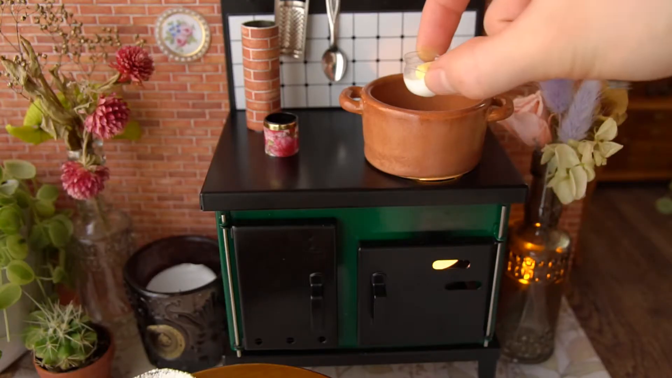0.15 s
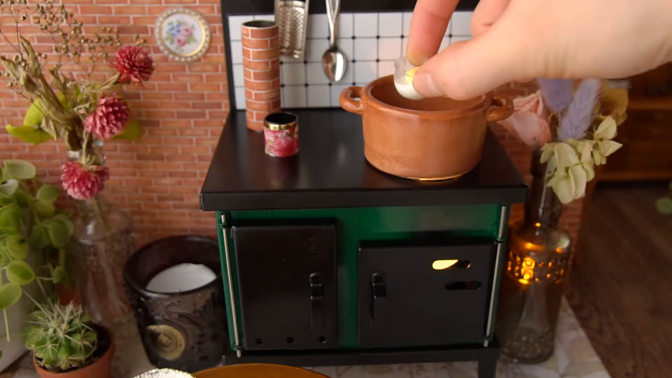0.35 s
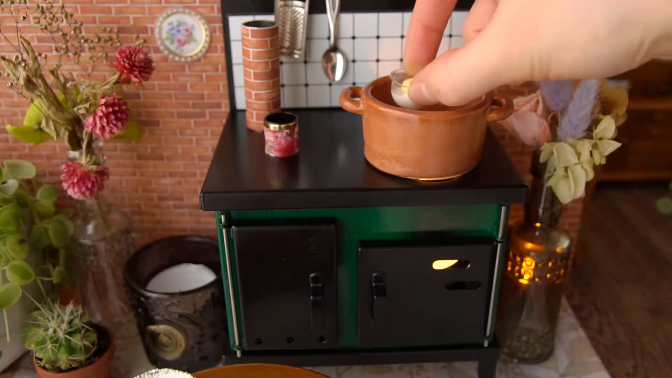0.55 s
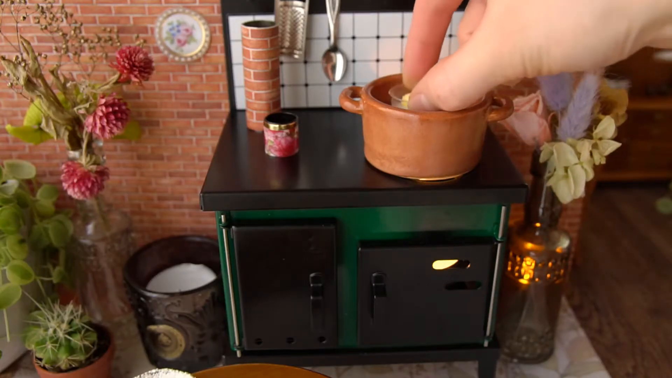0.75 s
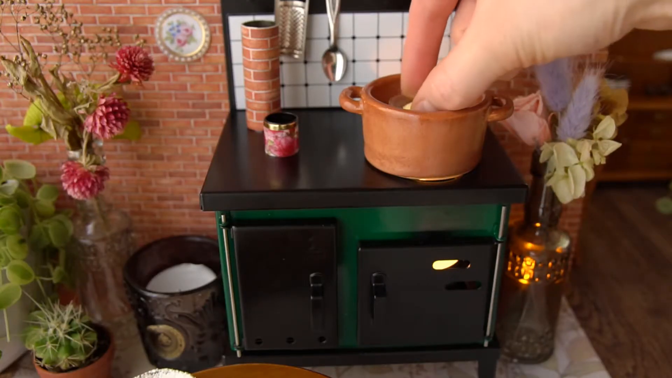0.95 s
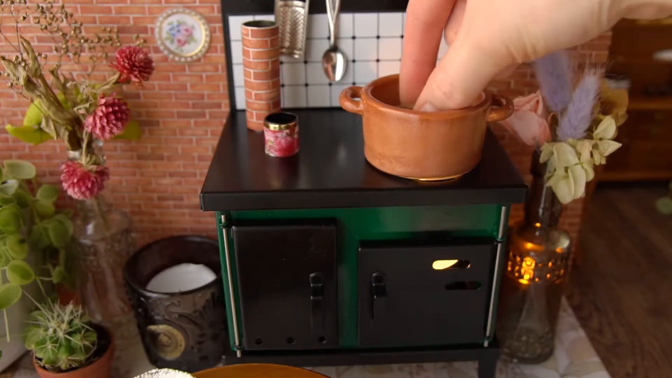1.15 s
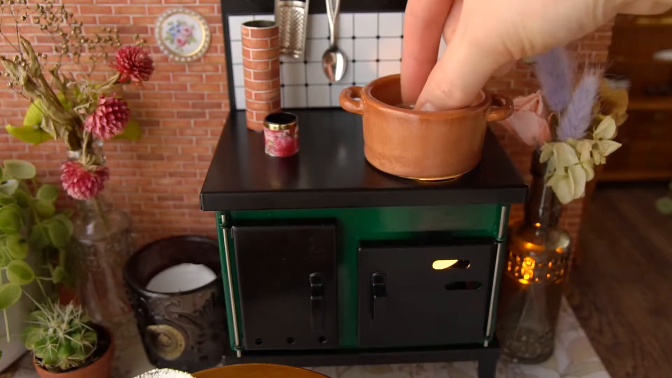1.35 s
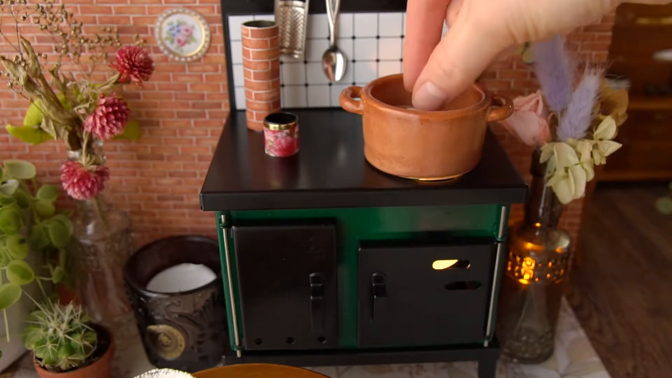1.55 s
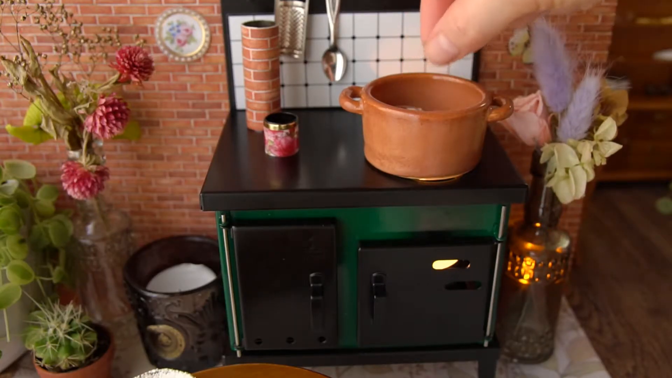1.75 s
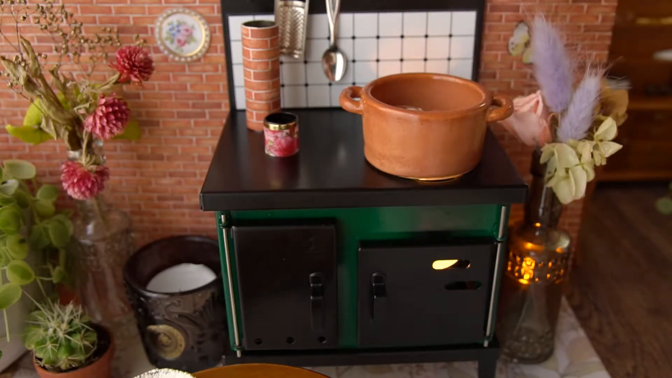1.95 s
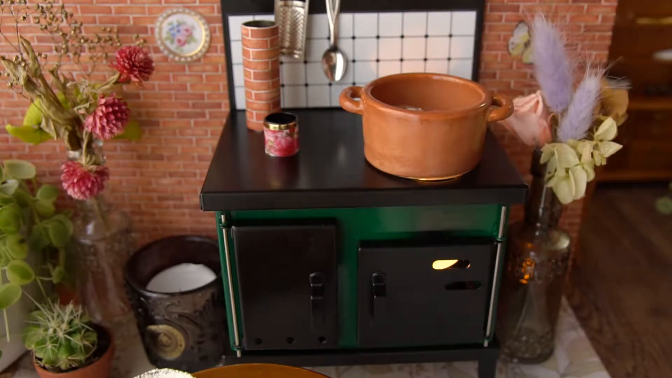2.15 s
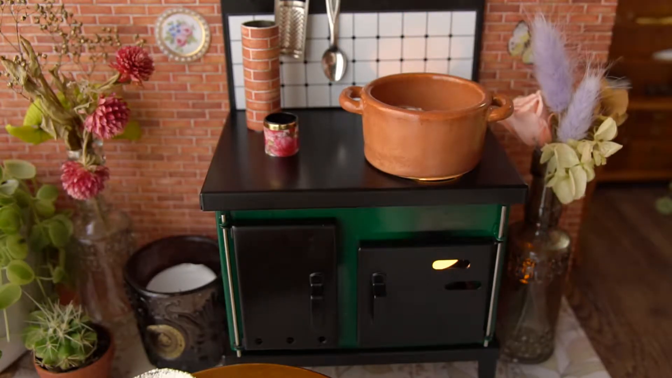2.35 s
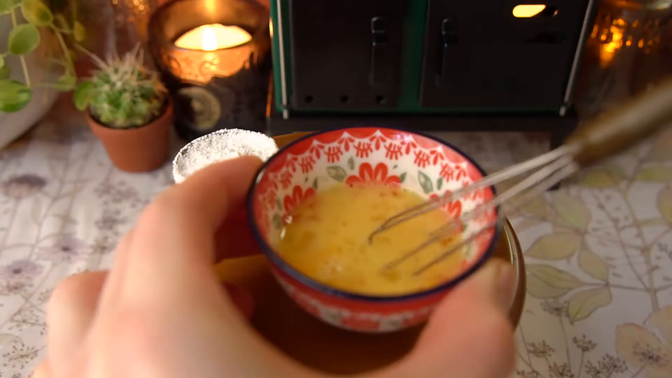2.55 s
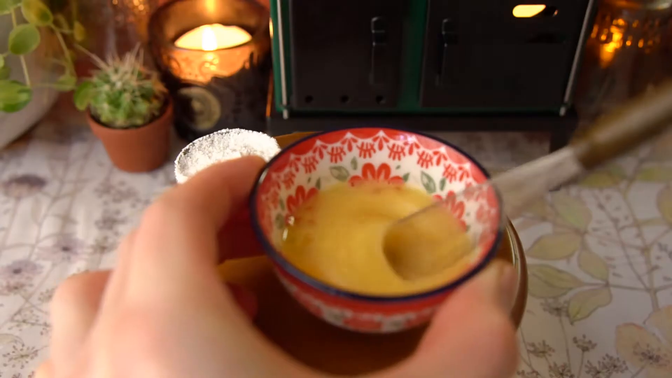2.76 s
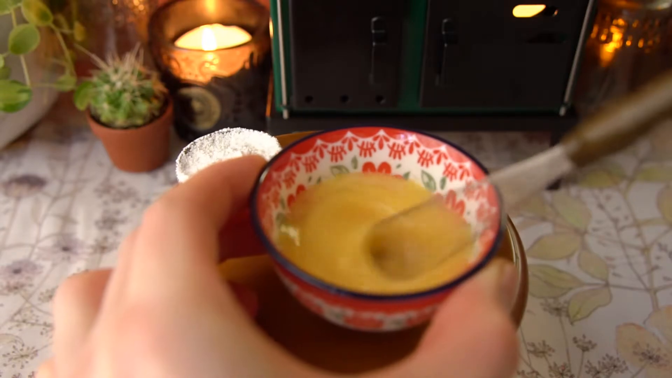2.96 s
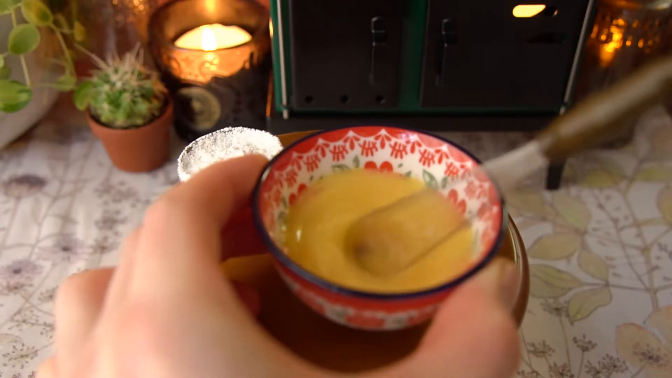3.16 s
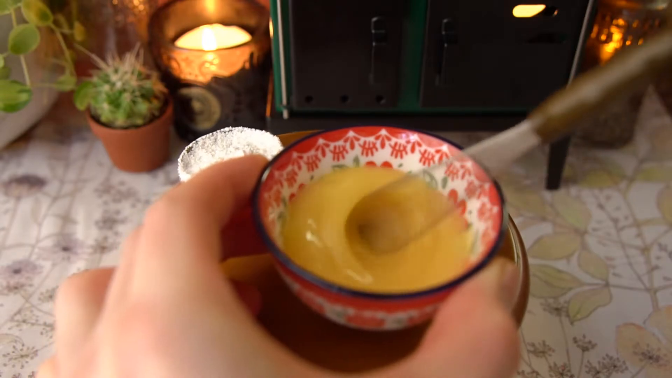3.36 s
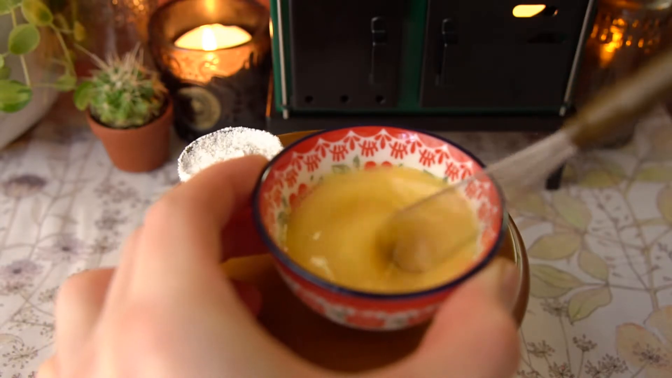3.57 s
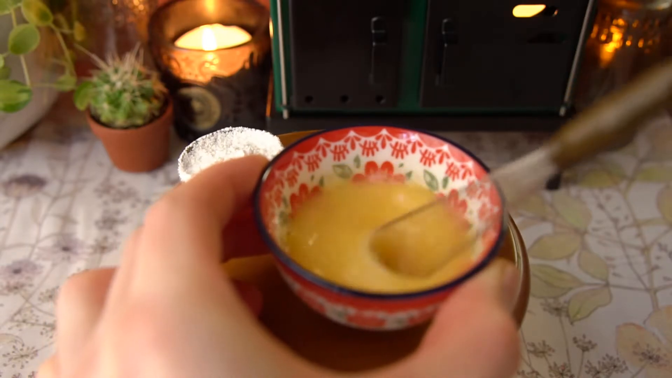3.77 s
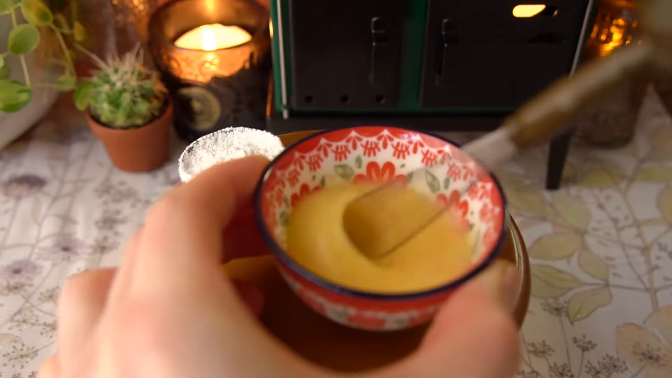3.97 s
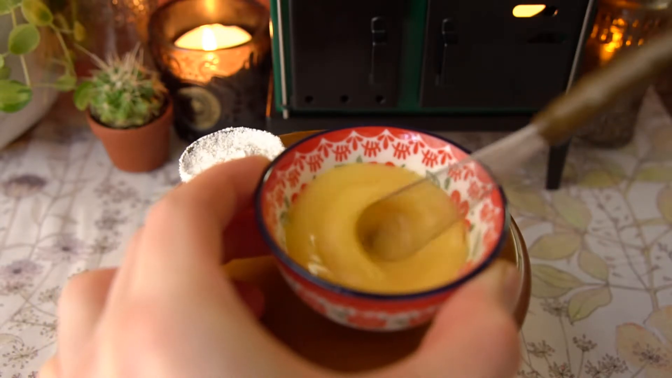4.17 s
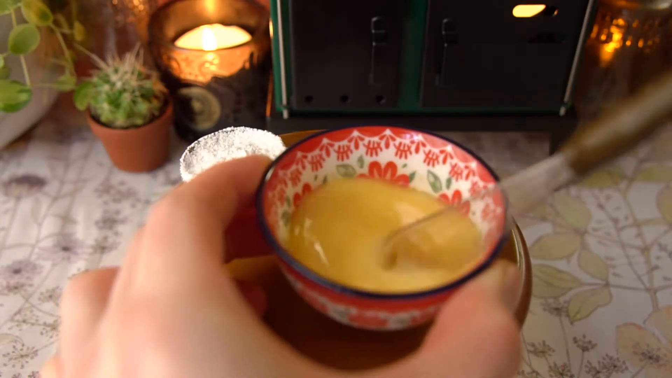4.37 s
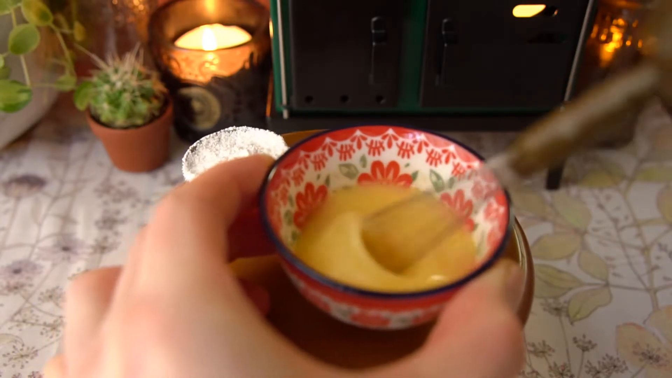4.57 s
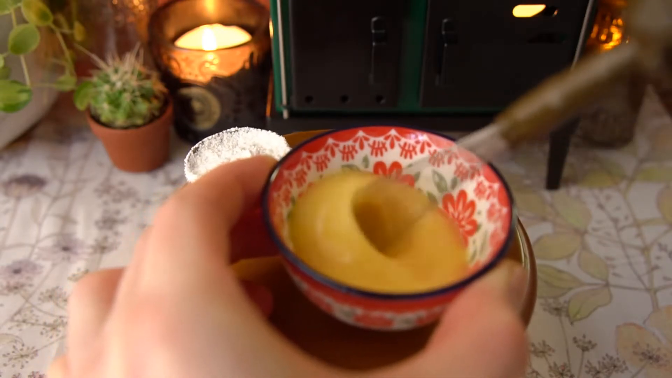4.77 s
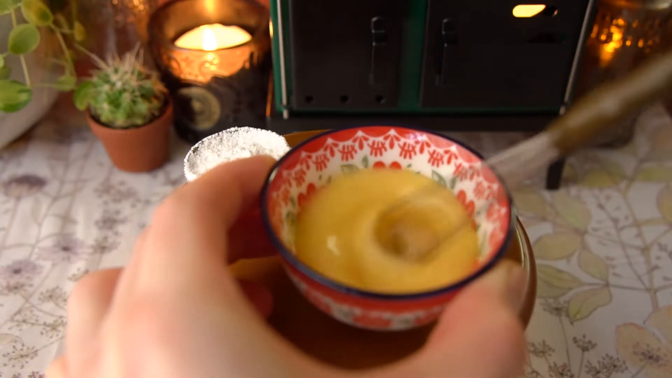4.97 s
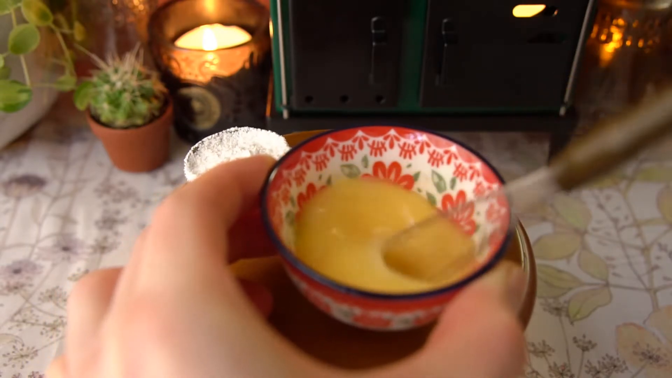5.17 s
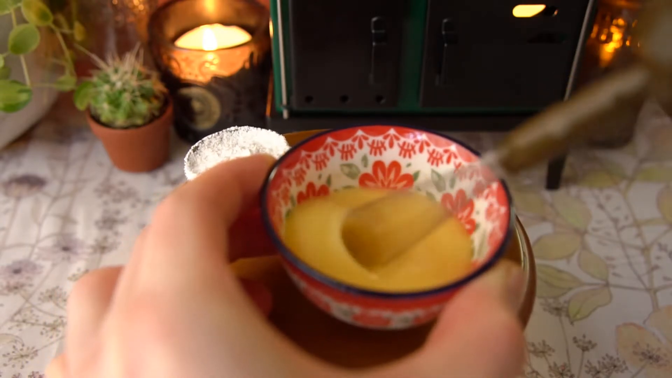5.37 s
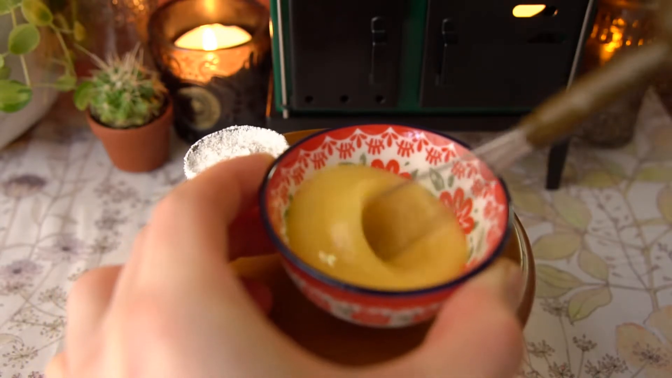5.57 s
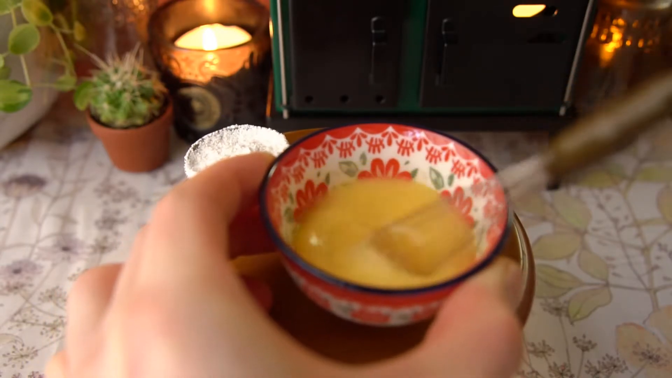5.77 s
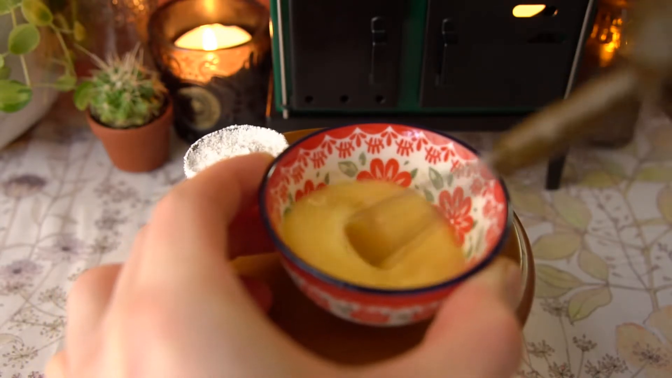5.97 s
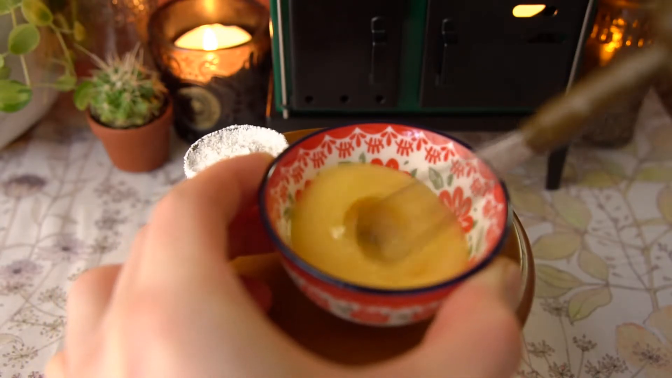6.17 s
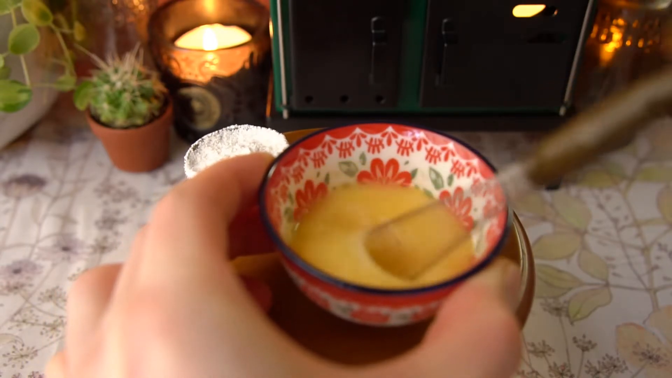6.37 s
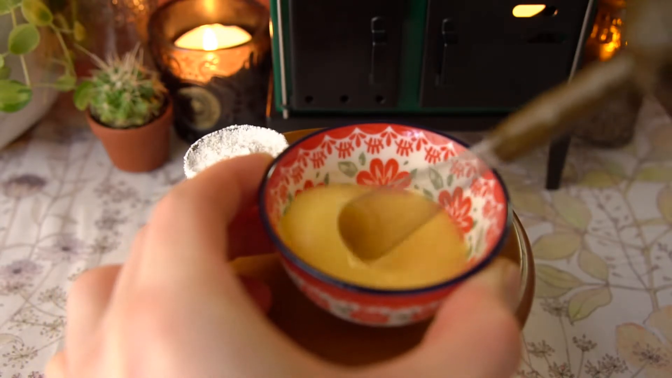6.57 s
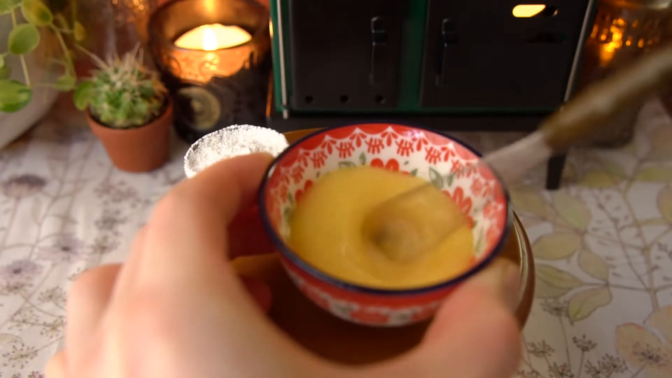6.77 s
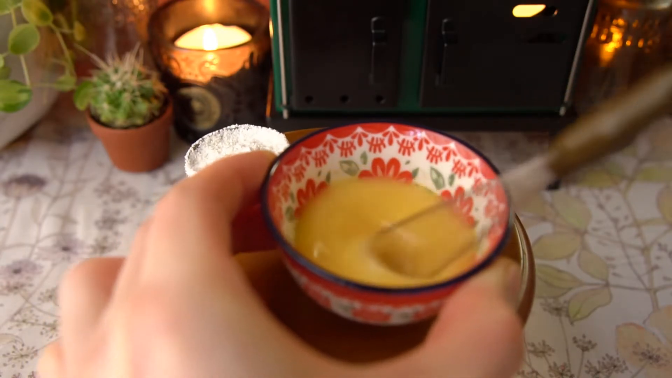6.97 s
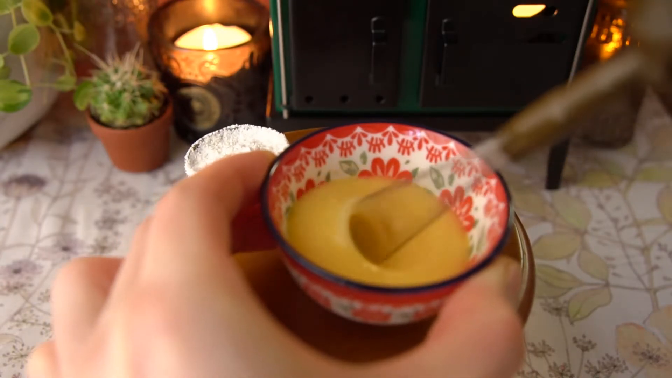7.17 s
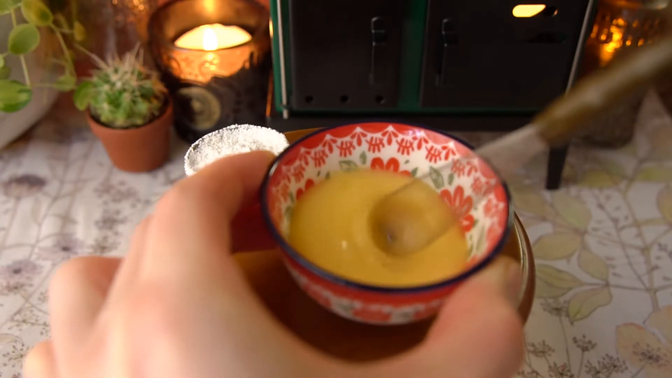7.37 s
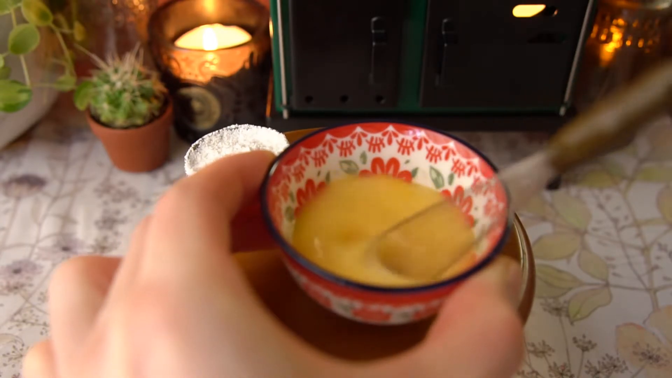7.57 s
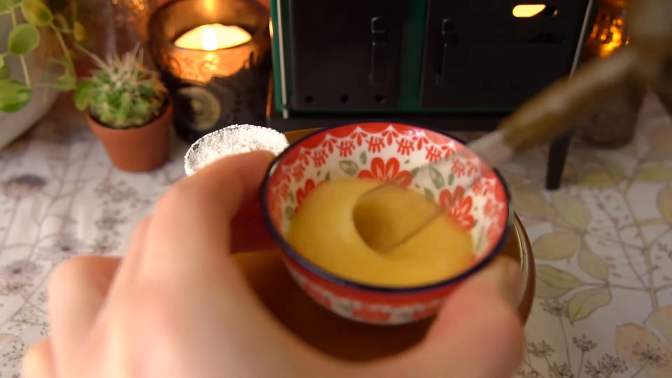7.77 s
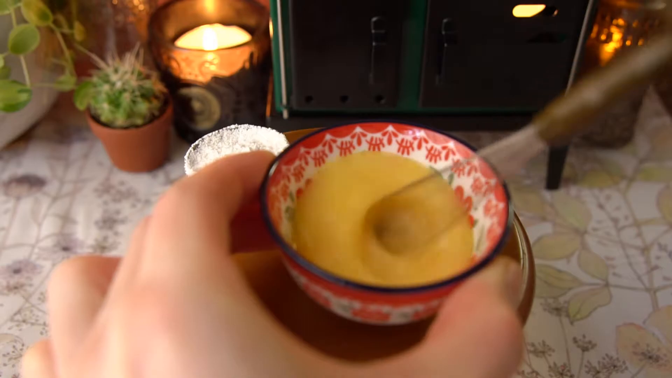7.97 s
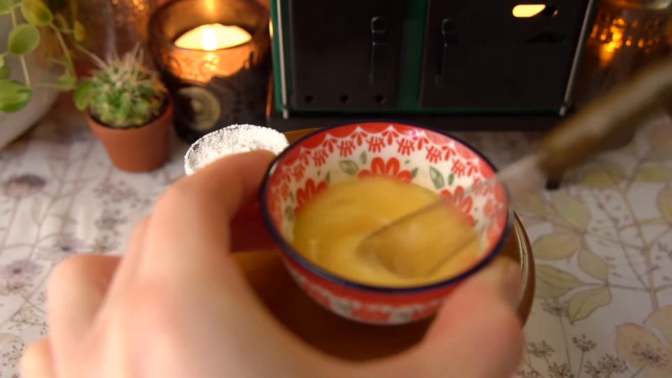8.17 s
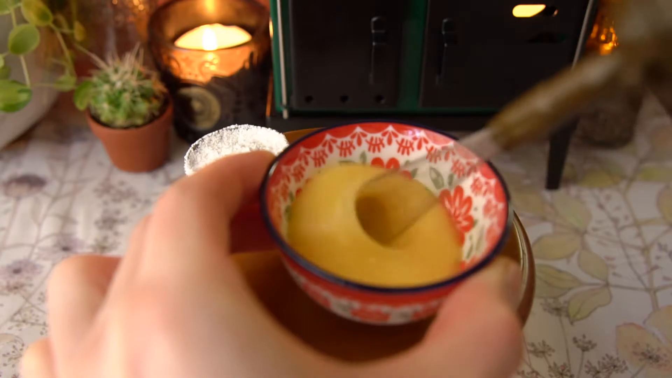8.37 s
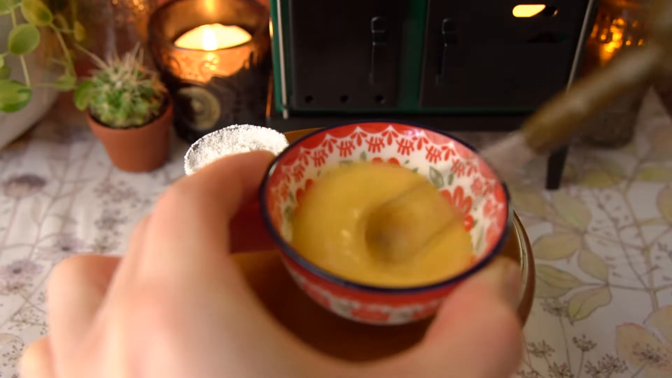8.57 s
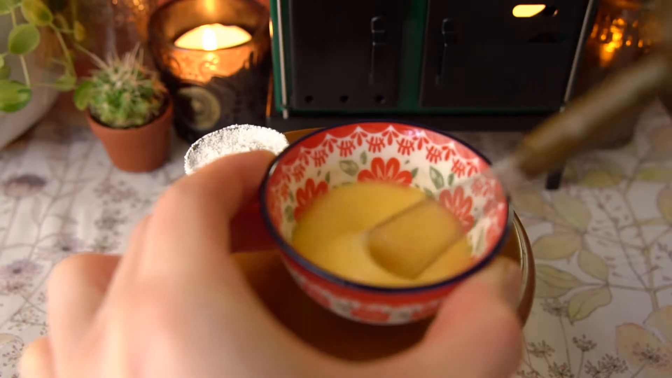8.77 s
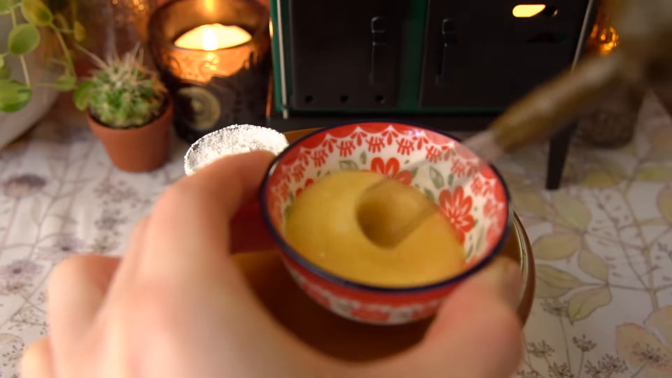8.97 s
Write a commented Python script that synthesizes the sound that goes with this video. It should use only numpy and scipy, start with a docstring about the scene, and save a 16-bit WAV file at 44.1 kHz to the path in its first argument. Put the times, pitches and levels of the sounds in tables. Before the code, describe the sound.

Faint scuffs and two light clay pot clicks in a quiet humming room, then a switch clicks and a tiny whisk rattles rapidly in a ceramic bowl.

```python
"""In a quiet, humming room soft scuffs and sagging low tones (distant thuds) come first, and a shell
is set into a small clay pot: chattering blows on ringing modes with noisy tails. From 2.4 s the
background level dips for a moment, a switch clicks and a tiny motor whisk starts in a hand-held
ceramic bowl of egg. Random wire ticks rattle over the glaze modes, low noise sloshes, and the wobbling
head knocks the wall about 20 times a second, with knocks sparse from 6.9 to 7.8 s."""
import sys
import numpy as np
from scipy import signal
from scipy.fft import rfft, irfft
from scipy.io import wavfile
from scipy.ndimage import uniform_filter1d

SR = 44100
rng = np.random.default_rng(int(sys.argv[2]) if len(sys.argv) > 2 else 0)


def master(y):
    """Save y as 16-bit WAV."""
    cut = np.clip(np.atleast_2d(y).T, -1, 1)
    pcm = np.round(cut * 32767)  # scale
    wavfile.write(sys.argv[1], SR, pcm.astype(np.int16))


def makeup_ratio(level_db):
    """Linear amplitude ratio for a level in decibels (20 dB per factor of ten)."""
    decades = np.asarray(level_db, float) / 20
    return 10 ** decades


N = 397782
WHISK_START_S = 2.575


def evened(x):
    """Scales to rms 1."""
    return x / np.sqrt(np.mean(x ** 2) + 1e-20)


def curve(rows):
    """Second column of a table over its times, joined by straight lines, one value a sample."""
    time_s, value = np.transpose(rows)
    return np.interp(np.arange(N) / SR, time_s, value)


def ring(x, hz, width_hz):
    """A two-pole mode with gain 1 at its peak."""
    r = np.exp(-np.pi * width_hz / SR)
    gain = (1 - r * r) / 2
    return signal.lfilter([gain, 0, -gain], [1, -2 * r * np.cos(2 * np.pi * hz / SR), r * r], x)


def train(time_s, size):
    """Single-sample blows at the given times."""
    at = np.clip(np.round(time_s * SR).astype(int), 0, N - 1)
    return np.bincount(at, size, N)


def add(mix, time_s, sound):
    """Lays a sound into the mix at the given time."""
    part = mix[round(time_s * SR):][:len(sound)]
    part += sound[:len(part)]


def struck(modes, tilt_db=0, lead_ratio=5.5, count=4096):
    """One blow on a set of modes, peak 1; a lower lead_ratio builds up over more cycles."""
    blow = np.eye(1, count)[0]
    out = np.zeros(count)
    for k, (hz, width_hz, db) in enumerate(modes):
        mode = ring(ring(blow, hz, lead_ratio * width_hz), hz, width_hz)
        out += (-1) ** k * makeup_ratio(db + tilt_db * np.log2(hz / 4000)) * mode
    return out / abs(out).max()


# wobbling head on the bowl wall, one row a knock: (time [s], strength [dB])
WALL_KNOCKS = [(2.646, -31), (2.69, -36), (2.741, -36), (2.803, -32), (2.857, -30), (2.91, -35),
               (2.965, -33), (3.014, -29), (3.064, -31), (3.115, -30.5), (3.165, -28.5), (3.215, -33.5),
               (3.263, -37), (3.315, -33), (3.364, -26), (3.412, -28), (3.462, -30), (3.515, -27.5),
               (3.568, -32), (3.624, -25.5), (3.678, -25.5), (3.73, -33), (3.783, -27.5), (3.832, -28.5),
               (3.879, -26), (3.928, -35), (3.974, -32), (4.029, -35), (4.071, -34), (4.119, -30),
               (4.168, -23.5), (4.219, -28), (4.271, -29), (4.322, -38), (4.373, -29), (4.426, -30.5),
               (4.478, -39), (4.532, -32), (4.58, -30), (4.632, -32), (4.683, -32), (4.736, -27),
               (4.784, -27), (4.823, -23), (4.882, -22), (4.926, -23), (4.978, -22.5), (5.032, -31),
               (5.086, -27), (5.149, -28), (5.203, -29), (5.255, -35), (5.308, -28), (5.356, -30),
               (5.416, -33), (5.456, -26.5), (5.512, -20.5), (5.564, -25), (5.618, -23), (5.669, -23.5),
               (5.721, -24.5), (5.775, -24), (5.84, -29), (5.895, -30), (5.947, -31.5), (6.001, -31),
               (6.05, -28), (6.102, -28), (6.153, -25.5), (6.205, -26), (6.247, -22), (6.309, -33),
               (6.362, -28), (6.418, -28), (6.471, -34), (6.521, -28), (6.569, -25.5), (6.616, -34),
               (6.667, -28), (6.717, -26.5), (6.767, -29), (6.817, -30), (6.87, -33), (6.921, -32.5),
               (7.218, -32.5), (7.454, -33), (7.783, -33), (7.826, -26.5), (7.873, -24.5), (7.923, -24.5),
               (7.97, -24), (8.018, -25), (8.068, -31), (8.117, -30), (8.169, -28), (8.22, -29.5),
               (8.27, -30), (8.318, -27), (8.363, -30), (8.413, -26), (8.462, -27), (8.509, -26.5),
               (8.559, -28), (8.606, -26), (8.659, -26), (8.71, -31), (8.753, -42), (8.954, -31),
               (9.0, -28)]
# wire rattle between knocks, before flutter: (time [s], level [dB])
RATTLE_LEVEL = [(2.65, -40.5), (2.79, -33.5), (3.3, -31.5), (3.5, -32.5), (3.9, -31), (5, -30.5),
                (6.3, -30.5), (6.9, -30.5), (7.05, -31), (7.4, -31), (7.87, -30), (8.5, -29), (9.02, -31)]
LAG_S = 0.003036  # row time to the peak of the swell
CREST_DB, CREST_PER_DB, USUAL_DB = 4, -0.05, -26.5  # swell at usual strength; change with strength
SWELL_S, LULL_S, FLUTTER_DB = 0.016, 0.012, 0.78


def wobble_db():
    """Rattle level: swells to each knock, slightly less for a hard one, sinks back, and flutters."""
    time_s, strength_db = np.transpose(WALL_KNOCKS)
    crest_db = np.maximum(CREST_DB + CREST_PER_DB * (strength_db - USUAL_DB), 0)
    rise = np.arange(0, 1, 1 / (SWELL_S * SR))
    fall = np.arange(1, 0, -1 / (LULL_S * SR))
    peaks = train(time_s + LAG_S - SWELL_S, crest_db)
    swells = signal.oaconvolve(peaks, np.concatenate([rise, fall]))[:N]
    smooth = uniform_filter1d(uniform_filter1d(rng.standard_normal(N), size=700), size=700)
    return curve(RATTLE_LEVEL) + swells + FLUTTER_DB * evened(smooth)


# ceramic bowl modes, relative levels in three grips:
# (frequency [Hz], width [Hz], first grip [dB], second grip [dB], third grip [dB])
BOWL_MODES = [(482, 75, -20, -18.5, -28.5), (692, 390, -17.5, -19.5, -21.5), (941, 122, -13, -14, -14.5),
              (1356, 500, -13.5, -12, -16), (1592, 240, -14, -14.5, -12.5), (1900, 490, -16, -13.5, -14.5),
              (2275, 590, -10.5, -13.5, -14.5), (2653, 330, -8, -8, -12), (2985, 153, -6.5, -5.5, -3),
              (3300, 440, -5.5, -6, -6.5), (3870, 430, -1.5, -2.5, -5.5), (4277, 590, -3.5, -1.5, -7),
              (4676, 397, 1, 0.5, 1.5), (5334, 770, -2.5, 0, -0.5), (6040, 300, -4, -4.5, -6.5),
              (6290, 810, -2.5, -2, 0), (7040, 690, -6.5, -5.5, -15), (8000, 620, -5, -5, -6.5),
              (8685, 620, -7.5, -6.5, -8), (9700, 1850, -16, -15, -15), (10840, 1900, -31, -40, -26),
              (11990, 920, -14, -17.5, -17.5), (12540, 540, -24, -29, -39), (14800, 3100, -27, -27.5, -26),
              (14800, 1200, -28.5, -28, -40)]
# hold on the bowl, fractions blend grips: (time [s], grip index)
GRIP = [(0, 0), (3.4, 0), (3.8, 1), (6.9, 1), (7.0, 2), (9.1, 2)]
# gain of rattle and slosh as the motor starts: (time [s], level [dB])
SPIN_UP = [(2.57, -69), (2.577, -22), (2.59, -19), (2.62, -2), (2.65, -1)]
TICKS_PER_S = 2100
DRIFT_DB, DRIFT_STEP = 1.37, 1000  # rms, samples between points
SCRAPE = 0.19


def rattle():
    """Uneven wire ticks over a fine scrape; each lands on another spot, waking modes differently."""
    start = round(2.5 * SR)
    count = round(TICKS_PER_S * (N / SR - WHISK_START_S))
    time_s = np.sort(rng.uniform(WHISK_START_S, N / SR, count))
    spot = rng.standard_normal((count, len(BOWL_MODES) + 1))  # last column is shared by all modes
    size = makeup_ratio(2.1 * np.minimum(rng.exponential(1, count), 4.5))
    grip = curve(GRIP)
    points = rng.standard_normal((N // DRIFT_STEP + 2, len(BOWL_MODES)))
    drift = evened(uniform_filter1d(points, size=10, axis=0))
    out = np.zeros(N)
    for k, (hz, width_hz, *grip_db) in enumerate(BOWL_MODES):
        # slow random drift: each mode's level wanders on its own
        drift_db = DRIFT_DB * np.interp(np.arange(N) / DRIFT_STEP, range(len(drift)), drift[:, k])
        mode_db = np.interp(grip, range(3), grip_db) + drift_db
        ticks = train(time_s, size * (spot[:, -1] / 2 + spot[:, k]))
        blows = ticks + SCRAPE * rng.standard_normal(N)
        drive = (blows * makeup_ratio(mode_db))[start:]
        out[start:] += ring(ring(drive, hz, width_hz), hz, width_hz)
    out /= np.sqrt(uniform_filter1d(out ** 2, 4000) + 1e-12)
    return out * makeup_ratio(wobble_db() + curve(SPIN_UP))


# wall ring, relative levels: (frequency [Hz], width [Hz], level [dB])
KNOCK_RING = [(1370, 880, 20), (1750, 380, -5), (2200, 500, 19), (3500, 740, 7), (5170, 2500, -16)]
# bowl body, relative levels: (frequency [Hz], width [Hz], level [dB])
KNOCK_BODY = [(313, 42, -20), (523, 32, 1), (724, 330, 3.5), (915, 150, 6)]
# thump in the hand, relative levels: (frequency [Hz], width [Hz], level [dB])
THUMP_MODES = [(54, 23, 3.5), (108, 32, -4.5), (200, 99, -9)]
# low shaking of hand and bowl, reference for thump and slosh: (time [s], level [dB])
SHAKE = [(2.62, -65), (2.65, -61.5), (3.58, -60), (3.69, -54), (3.76, -70), (3.99, -61), (4.44, -60),
         (4.46, -77), (4.55, -56), (4.63, -66.5), (4.94, -54), (5.27, -60.5), (5.77, -59), (5.92, -67.5),
         (6.27, -54), (6.36, -61), (6.93, -58), (6.99, -84), (7.09, -75), (7.11, -74), (7.45, -64),
         (7.72, -82), (7.82, -62), (8.55, -59), (8.88, -70), (9.02, -57)]
RING_DB, RING_SPREAD_DB, BODY_DB = -8.5, 2.5, -8.5  # re strength; spread: where the blow lands
THUMP_DB, THUMP_SPREAD_DB = 7.5, 2  # re SHAKE


def knocks():
    """Head hits wall once a wobble: stuttering rings, a sharp body blow, a thump in the hand."""
    time_s, strength_db = np.transpose(WALL_KNOCKS)
    luck = rng.standard_normal((len(time_s), 10))
    time_s = time_s + LAG_S
    ring_db = strength_db + RING_DB + RING_SPREAD_DB * luck[:, 9]
    body_db = strength_db + BODY_DB
    thump_db = np.interp(time_s, *np.transpose(SHAKE)) + THUMP_DB + THUMP_SPREAD_DB * luck[:, 8]

    ring_blows = train(time_s - .0015, makeup_ratio(ring_db))
    for k in range(3):
        stutter_s = time_s - .002 + 0.00297 * abs(luck[:, k])
        ring_blows = ring_blows + train(stutter_s, 1.6 * luck[:, k + 3] * makeup_ratio(ring_db))

    t = np.arange(4096) / SR
    body = np.zeros(4096)
    for hz, width_hz, db in KNOCK_BODY:
        body -= makeup_ratio(db) * width_hz * np.exp(-np.pi * width_hz * t) * np.sin(2 * np.pi * hz * t)
    bounce_s = time_s + 0.0042 + 0.00385 * abs(luck[:, 6])
    bounce = train(bounce_s, 0.63 * luck[:, 7] * makeup_ratio(body_db))
    body_blows = train(time_s - .0015, makeup_ratio(body_db)) + bounce

    thump_blows = train(time_s - .0025, makeup_ratio(thump_db))
    out = signal.oaconvolve(ring_blows, struck(KNOCK_RING))
    out += signal.oaconvolve(body_blows, body / abs(body).max())
    out += signal.oaconvolve(thump_blows, struck(THUMP_MODES, lead_ratio=2.7))
    return out[:N]


SLOSH_DB = 2.5  # re SHAKE


def slosh():
    """Egg and bowl shaken by the whisk: low noise that follows the shaking."""
    noise = rng.standard_normal(N)
    low = makeup_ratio(2.5) * ring(noise, 57, 18)
    low += makeup_ratio(-1.5) * ring(noise, 50, 89)
    low += makeup_ratio(-4.5) * ring(noise, 460, 800)
    level_db = curve(SHAKE) + curve(SPIN_UP) + SLOSH_DB
    return evened(low) * makeup_ratio(level_db) * (np.arange(N) > WHISK_START_S * SR)


def chatter(sound, chatter_db, t60_s):
    """A loose contact chatters: the blow repeats at random within 23 ms, fading. Peak 1."""
    t = np.arange(1024) / SR
    hits = rng.standard_normal(1024) * (rng.random(1024) < .12)
    repeats = hits * makeup_ratio(chatter_db - 60 * t / t60_s)
    repeats[0] = 1
    out = signal.oaconvolve(sound, repeats)[:len(sound)]
    return out / abs(out).max()


def clicks(rows, modes, chatter_db, t60_s):
    """Single chattering blows on one small object."""
    out = np.zeros(N)
    for time_s, peak_db, tilt_db in rows:
        add(out, time_s, makeup_ratio(peak_db) * chatter(struck(modes, tilt_db), chatter_db, t60_s))
    return out


# switch blows, positive tilt = brighter: (time [s], peak level [dB], tilt [dB/octave])
SWITCH_CLICKS = [(2.4262, -64, 3), (2.5065, -60, 5), (2.5384, -33, -6.5), (2.5610, -60, -6),
                 (2.5678, -41, 4), (2.5703, -30, 5), (2.5727, -17.5, -2), (2.5744, -30, -10)]
# switch modes, relative levels: (frequency [Hz], width [Hz], level [dB])
SWITCH_MODES = [(400, 600, -26), (1500, 1600, -11), (3000, 520, 1), (4500, 1100, 1), (6860, 1300, -5.5),
                (9300, 2200, -3.5), (13400, 2700, -21)]


def switch():
    """Switch parts strike small, broad modes with strong short chatter."""
    return clicks(SWITCH_CLICKS, SWITCH_MODES, chatter_db=-0.5, t60_s=0.011)


# shell on clay, positive tilt = brighter: (time [s], peak level [dB], tilt [dB/octave])
POT_CLICKS = [(0.5721, -61, 0), (1.2058, -25, 1.5), (1.2100, -20.5, 3.5), (1.3009, -48, -5),
              (1.3760, -55, 3), (1.3830, -48, -5), (1.4164, -27.5, 1)]
# clay pot modes, relative levels: (frequency [Hz], width [Hz], level [dB])
POT_MODES = [(600, 500, -20), (1230, 740, -12.5), (1750, 110, -7), (2470, 400, -6), (2920, 150, -1),
             (3500, 580, -8), (4430, 390, -15), (4710, 155, 5.5), (5570, 250, -5.5), (7250, 520, -10),
             (8140, 570, -16), (11400, 2400, -36)]


def pot():
    """Shell strikes the clay pot's modes with faint, longer chatter."""
    return clicks(POT_CLICKS, POT_MODES, chatter_db=-19, t60_s=0.049)


# soft scuffs, and the noisy tails of the pot clicks:
# (time [s], start level [dB], centre [Hz], width [Hz], 60 dB decay [s])
NOISE_BURSTS = [(.184, -62, 950, 300, 0.18), (.184, -67, 1600, 1500, 0.27), (.285, -63, 900, 500, 0.18),
                (.285, -72, 1500, 1500, 0.32), (.575, -61, 210, 30, 0.25), (.705, -59, 300, 200, 0.21),
                (.705, -64, 625, 40, 0.37), (.816, -59.5, 750, 400, 0.13), (.816, -68, 1600, 1700, 0.29),
                (1.105, -60, 296, 150, 0.32), (1.145, -69, 1400, 500, 0.35), (1.212, -54, 3300, 3500, 0.19),
                (1.226, -58, 9000, 6000, .05), (1.418, -60, 3000, 3980, 0.16)]


def scuffs_and_tails():
    """Decaying noise through paired resonances."""
    out, noise, age = np.zeros(N), rng.standard_normal(N), np.arange(SR // 2) / SR
    for time_s, db, hz, width_hz, t60_s in NOISE_BURSTS:
        start = round(time_s * SR)
        part = noise[start:start + SR // 2]
        band = evened(ring(ring(part, hz, 2 * width_hz), hz, width_hz))
        add(out, time_s, band * makeup_ratio(db - 60 * age / t60_s) * np.minimum(age / 0.0036, 1))
    return out


# distant thuds: (peak time [s], frequency at peak [Hz], level [dB], rise [s], fall [s])
THUDS = [(.2, 109, -59, .025, 0.0092), (.238, 95, -55, .03, .045), (.283, 102, -53, .012, .03),
         (.36, 91, -51, 0.061, .014), (.396, 91, -55, 0.021, .03), (.895, 89, -51, 0.097, 0.013),
         (.922, 87, -54, 0.013, 0.03), (1.221, 91, -53, 0.09, .014), (1.243, 92, -55, .012, .05)]
SAG_HZ_PER_S = 340


def thuds():
    """Low tones through the floor: pitch sags until the peak, then holds."""
    out = np.zeros(N)
    for peak_s, hz, db, rise_s, fall_s in THUDS:
        age = np.arange(-rise_s, fall_s, 1 / SR)
        turns = hz * age - SAG_HZ_PER_S * np.minimum(age, 0) ** 2 / 2 + rng.random()
        envelope = np.interp(age, [-rise_s, 0, fall_s], [0, 1, 0])
        add(out, peak_s - rise_s, np.sqrt(2) * makeup_ratio(db) * envelope * np.sin(2 * np.pi * turns))
    return out


# gain of the whole background, which dips briefly: (time [s], level [dB])
AIR_LEVEL = [(0, 1), (2.405, 1), (2.425, -10), (2.52, -10), (2.56, 1.5), (2.7, -2.5), (9.1, 2)]
# room standing waves, before the background gain: (frequency [Hz], width [Hz], level [dB rms])
ROOM_HUM = [(50, 7, -72.5), (67.4, 9.4, -70), (99.6, 8.4, -75.5), (146, 16, -77.5), (210, 9.2, -72.5),
            (359.5, 14, -81), (532, 27, -78.5), (617, 9.3, -85.5)]
# hiss spectrum, relative: (frequency [Hz], level [dB per Hz])
HISS_SPECTRUM = [(15, -30), (40, -15), (60, -10.5), (130, -6), (300, -8), (450, -12), (700, -14),
                 (1200, -21.5), (3000, -27), (10400, -29.5), (16000, -30.5)]
HISS_DB, WHINE_HZ, WHINE_DB = -67.5, 13900, -85  # rms, before the background gain


def air():
    """Microphone hiss, the room's standing waves and one thin electric whine."""
    spectrum_hz, spectrum_db = np.transpose(HISS_SPECTRUM)
    bin_hz = np.fft.rfftfreq(N, 1 / SR)
    shape_db = np.interp(np.log(bin_hz + 1), np.log(spectrum_hz + 1), spectrum_db)
    hiss = evened(irfft(rfft(rng.standard_normal(N)) * makeup_ratio(shape_db), N))
    noise, hum = rng.standard_normal(N), np.zeros(N)
    for hz, width_hz, db in ROOM_HUM:
        hum += makeup_ratio(db) * evened(ring(ring(noise, hz, 2 * width_hz), hz, width_hz))
    whine = np.sqrt(2) * makeup_ratio(WHINE_DB) * np.sin(2 * np.pi * WHINE_HZ * np.arange(N) / SR)
    return makeup_ratio(curve(AIR_LEVEL)) * (makeup_ratio(HISS_DB) * hiss + hum + whine)


def echoes(tap_s, sign, t60_s, smoothing):
    """Decaying taps, one-pole dulled, unit energy."""
    taps = train(tap_s, sign * makeup_ratio(-60 * tap_s / t60_s))[:SR // 2]
    taps = signal.lfilter([1], [1, -smoothing], taps)
    return taps / np.linalg.norm(taps)


def room(x, near_db=-16, far_db=-28):
    """Sparse taps of random sign: quick echoes off nearby things plus a duller room tail."""
    grid = np.arange(60, SR // 2 - 20, 20)
    tap_s = (grid + rng.integers(0, 20, (2, len(grid)))) / SR
    sign = rng.choice([-1., 1.], tap_s.shape)
    near = echoes(tap_s[0], sign[0], t60_s=0.016, smoothing=0.3)
    far = echoes(tap_s[1], sign[1], t60_s=0.26, smoothing=0.7)
    return x + signal.oaconvolve(x, makeup_ratio(near_db) * near + makeup_ratio(far_db) * far)[:N]


def scene():
    """Near sources in the room, over its air; the bowl has weaker near echoes, a stronger tail."""
    hand = pot() + switch()
    whisk = room(rattle() + knocks(), near_db=-22, far_db=-19)
    return (room(hand) + whisk + slosh() + scuffs_and_tails() + thuds() + air())[None]


def band_limit(x):
    """A steep low-pass at the top of the band."""
    return signal.sosfilt(signal.butter(12, 16940, fs=SR, output="sos"), x)


def record(dry):
    """A high-pass at 36 Hz and a low-pass at 15.8 kHz finish the mix."""
    high_pass = signal.butter(2, 36, "hp", fs=SR, output="sos")
    low_pass = signal.firwin(511, 15800, window=("kaiser", 9), fs=SR)
    mix = signal.sosfilt(high_pass, dry)
    mix = signal.oaconvolve(mix, low_pass[None], "same")
    return band_limit(mix)


dry = scene()
out = record(dry)
master(out)
```